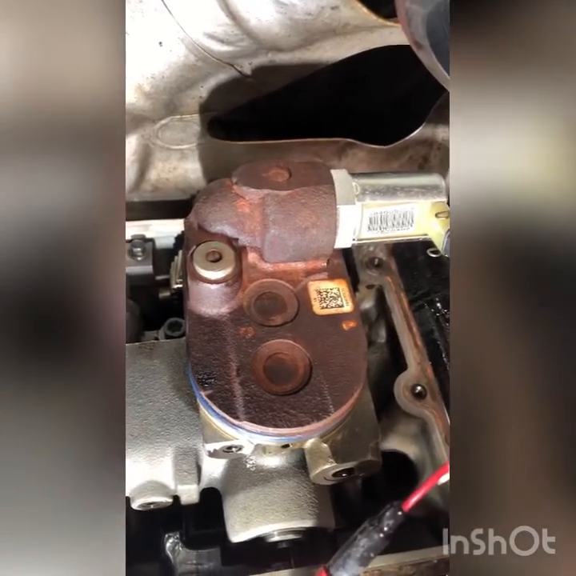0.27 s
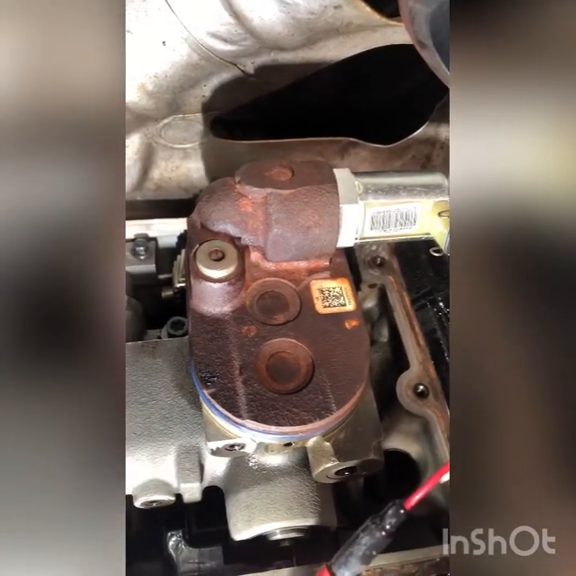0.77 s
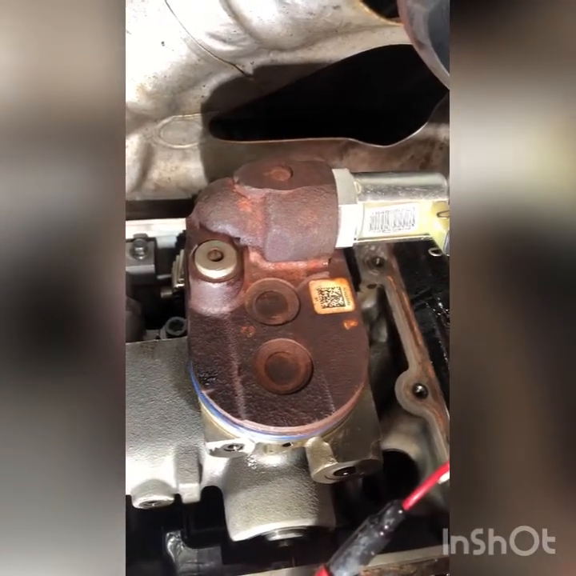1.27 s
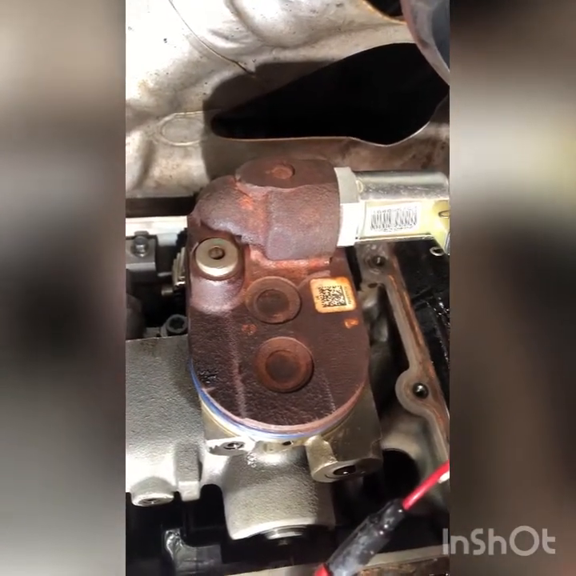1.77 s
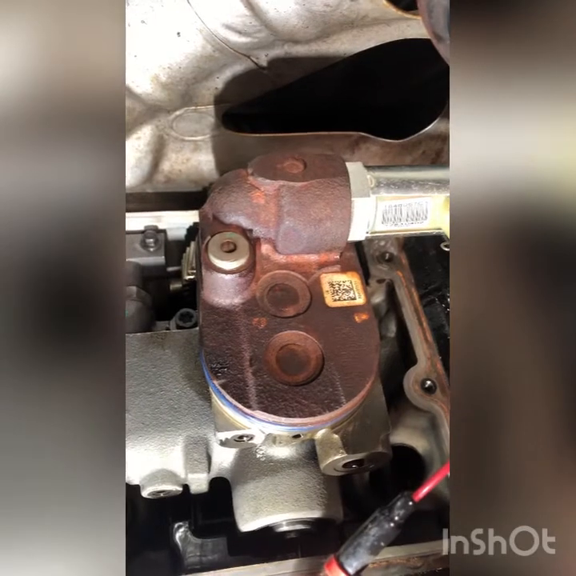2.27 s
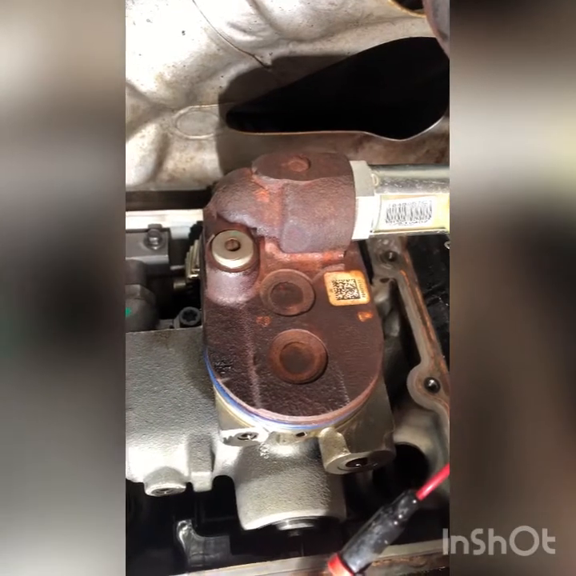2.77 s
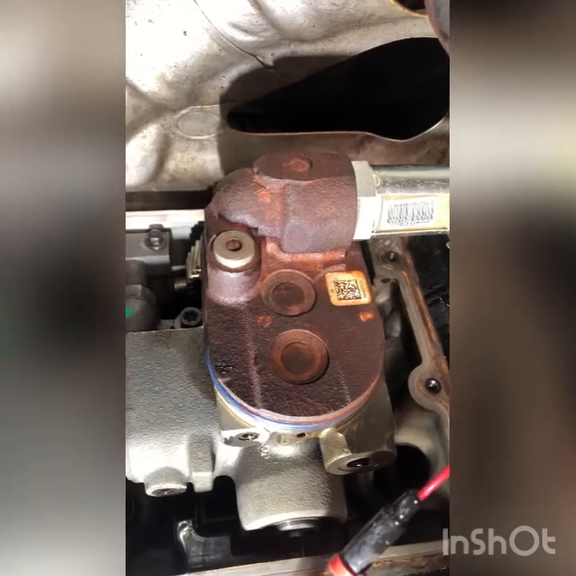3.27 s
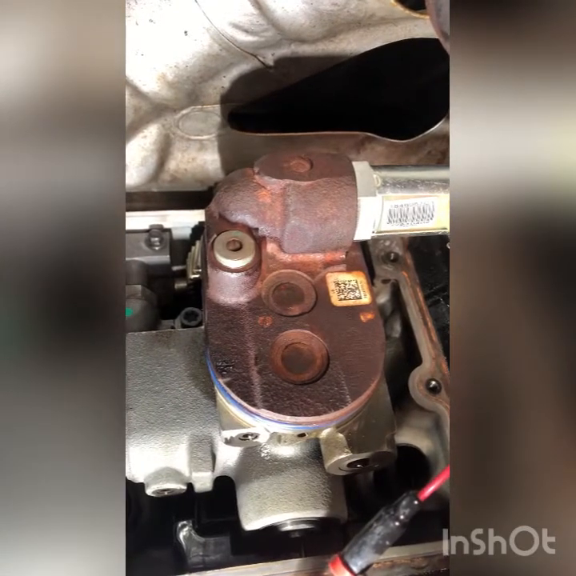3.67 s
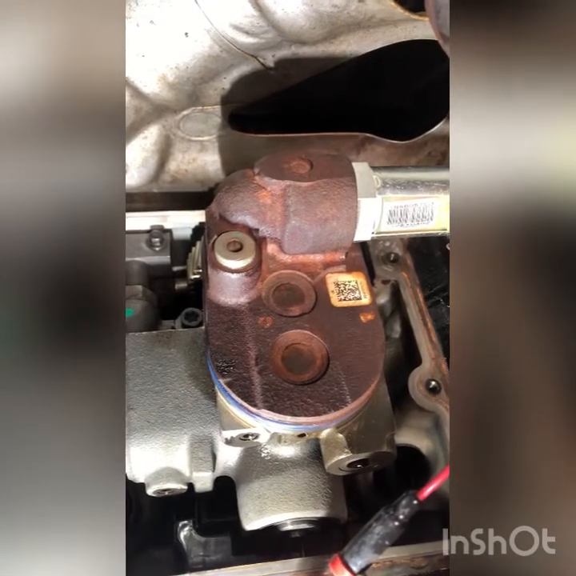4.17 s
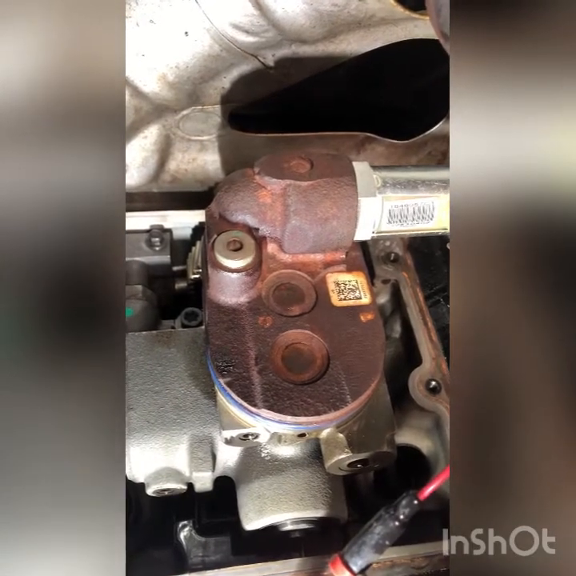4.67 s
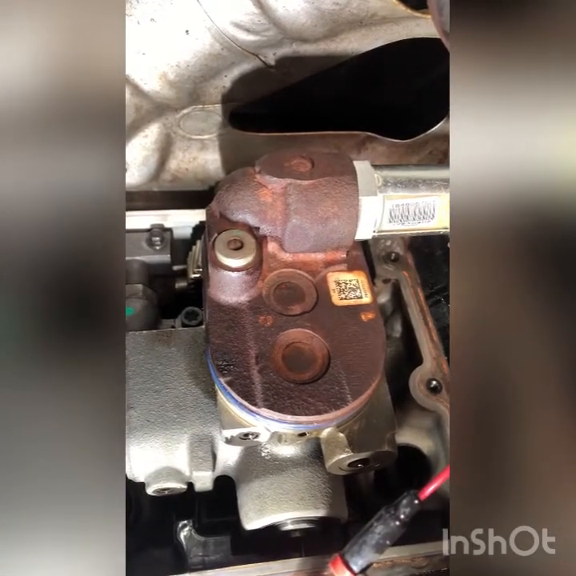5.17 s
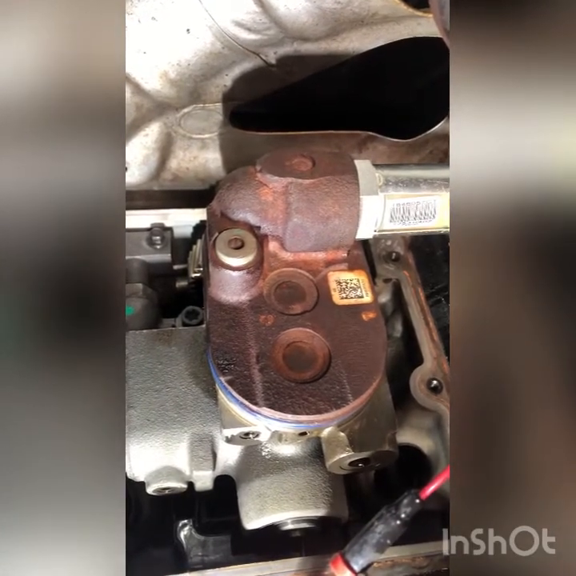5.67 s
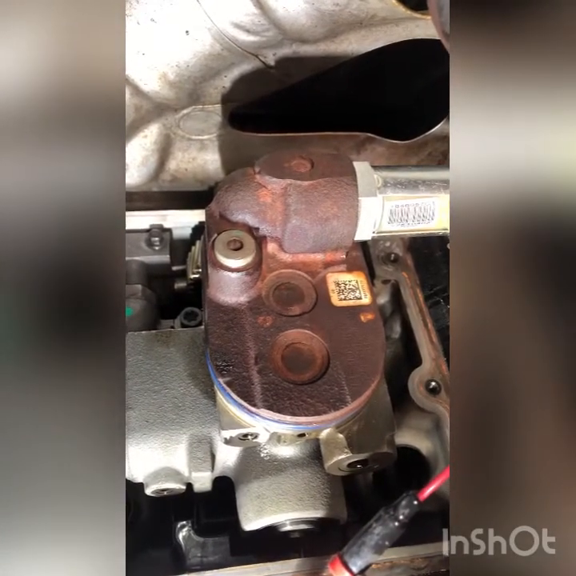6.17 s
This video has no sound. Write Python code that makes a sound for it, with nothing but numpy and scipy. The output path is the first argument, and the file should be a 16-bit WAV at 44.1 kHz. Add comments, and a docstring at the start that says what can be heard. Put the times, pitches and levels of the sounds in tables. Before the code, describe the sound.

Compressed air seeps thinly past a shut solenoid valve on an engine, close to the microphone, with faint high whistles. The valve ticks softly open and air hisses out, bright and steady, until a sharp, briefly ringing clack cuts it off and only the leak remains. This happens a second time, then a third burst runs on to the end. A quiet workshop rumbles low in the background.

```python
"""A thin, faintly whistling leak over the low rumble of a quiet workshop: compressed air seeps past
a shut solenoid valve on an engine, close to the microphone. The plunger ticks free and the air hisses
out, sounding the cavities of the casting, until the solenoid snaps the valve shut with a ringing clack
and only the leak is left. The valve opens three times; the last burst runs on."""
import sys
import numpy as np
from scipy import signal
from scipy.fft import rfft, irfft
from scipy.io import wavfile

SR = 44100
rng = np.random.default_rng(int(sys.argv[2]) if len(sys.argv) > 2 else 0)


def pcm_store(signal):
    """Save signal as 16-bit PCM."""
    levels = np.round(np.clip(np.atleast_2d(signal), -1, 1) * 32767)
    wavfile.write(sys.argv[1], SR, levels.astype(np.int16).T)


N = 282681
TIME = np.arange(N) / SR


def from_db(db):
    """Decibels to gain."""
    return 10 ** (np.asarray(db) / 20)


def rms_one(x):
    """Scale to unit power."""
    return x / np.sqrt(np.mean(x ** 2) + 1e-20)


def band(x, hz, width_hz):
    """Flat-topped resonance with steep sides, gain 1 on top."""
    low = np.hypot(hz, width_hz / 2) - width_hz / 2
    edges = [low, min(low + width_hz, SR / 2 - 100)]
    return signal.sosfilt(signal.butter(2, edges, "band", fs=SR, output="sos"), x + 1e-18)


def low_cut(x, hz):
    """Remove the bass below hz."""
    return signal.sosfilt(signal.butter(4, hz, "high", fs=SR, output="sos"), x)


def noise(spectrum):
    """Steady noise with a given colour, rms 1."""
    hz, db = np.transpose(spectrum)
    bins_hz = np.maximum(np.arange(N // 2 + 1) * SR / N, 1)
    colour = from_db(np.interp(np.log(bins_hz), np.log(hz), db))
    return rms_one(irfft(rfft(rng.standard_normal(N)) * colour, N))


def drift(rate):
    """Random wander of spread about 1 that turns rate times a second."""
    knots = rng.standard_normal(4096)
    return np.interp(TIME * rate, np.arange(len(knots)), knots)


def since(start):
    """Seconds after a moment, zero before it."""
    return np.maximum(TIME - start, 0)


def since_latest(moments):
    """Seconds after the latest of some ordered moments, or after time zero until the first."""
    age = TIME
    for moment in moments:
        age = np.where(TIME > moment, TIME - moment, age)
    return age


def dying(age, t60):
    """Exponential decay by 60 dB in t60 seconds."""
    return from_db(np.maximum(-60 * age / t60, -200))


def tone(pitch_hz):
    """A sine that follows a changing pitch."""
    return np.sin(2 * np.pi * np.cumsum(pitch_hz) / SR)


def glides(rows, waver_hz):
    """Tones that swell, slide evenly in pitch and fade, all with the same waver."""
    out = np.zeros(N)
    for start, length, first_hz, last_hz, db in rows:
        progress = np.clip((TIME - start) / length, 0, 1)
        pitch_hz = first_hz + (last_hz - first_hz) * progress + waver_hz
        swell = np.sqrt(8 * progress * (1 - progress))
        out += from_db(db) * swell * tone(pitch_hz)
    return out


def tick(start, t60, hz=11000, width_hz=12000):
    """A short, noisy contact of steel on steel, bright unless given a lower band."""
    envelope = (TIME > start) * dying(since(start), t60)
    return band(envelope * rng.standard_normal(N), hz, width_hz)


# Room tone, the building's rumble all around the microphone: (frequency [Hz], relative level [dB])
RUMBLE_SPECTRUM = [(15, -54), (25, 7), (35, -27), (54, 3), (86, -2.5), (130, -0.5), (189, -5), (218, -13),
                   (301, -16), (341, -15), (553, -20.5), (790, -13.5), (1400, -27), (1800, -25),
                   (2340, -42), (3960, -120)]
# Faint hiss in the same room tone: (frequency [Hz], relative level [dB])
ROOM_HISS_SPECTRUM = [(1000, 7.5), (3500, -9), (5000, 12.5), (7000, 8), (9600, -25), (12000, -23),
                      (15500, -9)]
# Machines humming far from the microphone: (frequency [Hz], level [dB])
MACHINE_HUM = [(72, -69), (120, -67), (148, -66.5)]

def workshop(rumble_db=-56.5, hiss_db=-72, waver_db=5.5, wander_hz=1.357):
    """Low rumble of the building with a wavering machine hum and a faint, even hiss."""
    hum = np.zeros(N)
    for hz, db in MACHINE_HUM:
        amplitude = np.sqrt(2) * from_db(db + waver_db * drift(5.2))
        hum += amplitude * tone(hz + wander_hz * drift(6))
    rumble = from_db(rumble_db) * noise(RUMBLE_SPECTRUM)
    return rumble + hum + from_db(hiss_db) * noise(ROOM_HISS_SPECTRUM)


# Whines from across the workshop:
# (time [s], length [s], first pitch [Hz], last pitch [Hz], level [dB])
FAR_WHINES = [(0.36, 0.65, 338, 346, -71), (2.46, 0.56, 352, 372, -70.5)]

def whines(waver_hz=3):
    """A faint, far whine that comes and goes, rising a little each time."""
    return glides(FAR_WHINES, waver_hz * drift(20))


# Soft bumps near the microphone: (time [s], frequency [Hz], width [Hz], time spread [s], level [dB])
NEAR_BUMPS = [(0.665, 770, 100, 0.0091, -63), (0.702, 418, 110, 0.0072, -55), (2.302, 184, 50, 0.017, -50),
              (2.813, 117, 49.5, 0.046, -52.5), (4.547, 145, 30, 0.023, -44),
              (4.548, 340, 200, 0.023, -53.5), (4.737, 184, 70, 0.0088, -42), (5.903, 407, 150, 0.019, -59),
              (6.127, 55, 40, 0.067, -53)]

def bumps():
    """Dull, short swells of low noise."""
    out = np.zeros(N)
    for peak_s, hz, width_hz, spread_s, db in NEAR_BUMPS:
        swell = np.exp(-.5 * ((TIME - peak_s) / spread_s) ** 2)
        out += from_db(db) * swell * rms_one(band(rng.standard_normal(N), hz, width_hz))
    return out


def walls(x, delay_s=0.011, t60=0.24, top_hz=1800):
    """Dull, diffuse echoes that reach the microphone from the engine bay and the walls."""
    tail = (TIME > delay_s) * dying(TIME, t60) * rng.standard_normal(N)
    tail /= np.linalg.norm(tail)
    dull_tail = signal.sosfilt(signal.butter(2, top_hz, fs=SR, output="sos"), tail)
    return signal.fftconvolve(x, dull_tail)[:N]


# Whistles at the valve seat, faint even close up:
# (time [s], length [s], first pitch [Hz], last pitch [Hz], level [dB])
SEAT_WHISTLES = [(0.32, 0.07, 9050, 8550, -70), (0.495, 0.075, 9170, 9130, -65),
                 (2.905, 0.087, 7550, 7200, -63), (3.04, 0.41, 6950, 9340, -67)]

def whistles(waver_hz=95, flicker_db=3):
    """The leak locks briefly into a thin, unsteady tone that glides as the gap creeps."""
    return glides(SEAT_WHISTLES, waver_hz * drift(400)) * from_db(flicker_db * drift(40))


# Bursts of the valve in front of the microphone; the last shuts only after the scene has ended:
# (opening time [s], shutting time [s], flow gain [dB], clack gain [dB])
VALVE_BURSTS = [(0.868, 2.3613, 0, 0.7), (3.663, 4.7608, 0, -2), (5.589, 7.0, -0.04, -2.2)]

def flow(rise_s, shut_t60=0.042, seating_s=0.00056):
    """Air flow: it swells as the plunger lifts and collapses once it has landed."""
    out = np.zeros(N)
    for opens, shuts, flow_db, _ in VALVE_BURSTS:
        swell = 1 - np.exp(-since(opens) / rise_s)
        out += from_db(flow_db) * swell * dying(since(shuts + seating_s), shut_t60)
    return out


def leak(settled_db=-24.5, tight_db=-7.5, level_relax_s=0.46, tilt_relax_s=0.2, already_shut_s=0.5):
    """Each snap presses the seat tight: the leak turns weaker and duller, then creeps back."""
    shut_for = since_latest([-already_shut_s] + [shuts for _, shuts, _, _ in VALVE_BURSTS])
    level_db = settled_db + tight_db * np.exp(-shut_for / level_relax_s)
    tilt_db_per_octave = 0.2 - 4 * np.exp(-shut_for / tilt_relax_s)
    return level_db, tilt_db_per_octave


def unsticking(lead_s=0.008, tick_db=-46):
    """The plunger ticks softly as it comes free, just before the air gets through."""
    return from_db(tick_db) * sum(tick(opens - lead_s, t60=0.032) for opens, *_ in VALVE_BURSTS)


def shudder(thud_db=-13, t60=0.077, hz=500, width_hz=800):
    """The snap shakes the many parts around the valve into a short, pitchless thud."""
    return sum(from_db(thud_db + clack_db) * tick(shuts, t60, hz, width_hz)
               for _, shuts, _, clack_db in VALVE_BURSTS)


# Ringing of the valve body and its mount, close up: (frequency [Hz], relative level [dB], t60 [s])
BODY_MODES = [(72, -47.5, 1.34), (144.1, -38.5, 0.5), (178, -22, 0.045), (239.6, -36.5, 0.29),
              (315, -40, 0.022), (423, -37, 0.15), (544, -32, 0.19), (700, -36, 0.29), (722.6, -33.5, 0.32),
              (738, -13.5, 0.076), (777, -24.5, 0.15), (884, -21, 0.02), (997, -26, 0.05),
              (1193, -31.5, 0.044), (1250, -43, 0.05), (1514, -29, 0.04), (1850, -30, 0.06),
              (2057, -25, 0.056), (2140, -16.5, 0.029), (2236, -33, 0.11), (2380, -44, 0.11),
              (2510, -29, 0.065), (2557, -23.5, 0.064), (2642, -18.5, 0.05), (2800, -40, 0.08),
              (2820, -24, 0.062), (3020, -49, 0.077), (4040, -33, 0.073), (4310, -27.5, 0.024)]

def clack(delay_cycles=0.93, ring_db=-0.5, tick_db=-27):
    """The plunger lands: a tick, and body modes that each start about a cycle late."""
    out = np.zeros(N)
    for _, shuts, _, clack_db in VALVE_BURSTS:
        ringing = (TIME > shuts) & (TIME < shuts + 1)
        for hz, db, t60 in BODY_MODES:
            age = np.maximum(TIME[ringing] - shuts - delay_cycles / hz, 0)
            mode = dying(age, t60) * np.sin(2 * np.pi * hz * age)
            out[ringing] += from_db(ring_db + clack_db + db) * mode
        out += from_db(clack_db + tick_db) * tick(shuts, t60=0.017)
    return low_cut(out, hz=60)  # the clack carries no deep bass


def jet_colour(hz, open_for, pivot_hz=7050, spurt_db=3, spurt_hz=7460, spurt_octaves=0.14, spurt_s=0.18):
    """Gain of the open jet at one pitch: a shrill first spurt, then a slow mellowing."""
    tilt_db_per_octave = 0.43 - 0.5 * open_for
    spurt = np.exp(-(np.log2(hz / spurt_hz) / spurt_octaves) ** 2 - open_for / spurt_s)
    return from_db(tilt_db_per_octave * np.log2(hz / pivot_hz) + spurt_db * spurt)


# Air resonances of the passages in the casting, close to the microphone:
# (frequency [Hz], width [Hz], gain [dB])
CASTING_PASSAGES = [(241.3, 27, -36.5), (310, 450, -47.5), (534, 30, -40.5), (759, 157, -35.5),
                    (792.2, 21, -28.5), (900, 36, -42), (1034, 116, -39), (1186, 79, -38.5),
                    (1304, 34, -36.5), (1516, 160, -40.5), (1691, 186, -35), (2024, 84, -30),
                    (2146, 96, -25), (2238, 41, -24.5), (2360, 63, -23.5), (2493, 56, -23),
                    (2529, 31, -20.5), (2650, 78, -20), (2860, 210, -26.5), (2916, 68, -21.5),
                    (3044, 31, -26), (3310, 185, -32.5), (3494, 58, -30), (3610, 250, -38.5),
                    (3820, 110, -29), (4001, 101, -20.5), (4159, 161, -20.5), (4270, 39, -22),
                    (4466, 36, -29), (4730, 85, -38.5), (4700, 740, -42.5), (5400, 58, -30.5),
                    (5624, 63, -20), (5752, 120, -23), (5902, 68, -37), (6170, 111, -24.5),
                    (6410, 110, -37.5), (6940, 480, -36), (7110, 94, -35), (7266, 70, -25),
                    (7472, 156, -20.5), (7630, 71, -30), (7800, 260, -32), (8130, 133, -27.5),
                    (8630, 250, -31.5), (9100, 270, -30), (9770, 647, -44.5), (10427, 172, -25.5),
                    (10886, 350, -24.5), (10900, 32, -31), (11470, 136, -26.5), (11900, 230, -38.5),
                    (12200, 380, -43), (12785, 150, -31.5), (13114, 216, -42), (14200, 72, -32),
                    (13750, 330, -29.5), (14483, 190, -33), (14715, 131, -30.5), (15071, 1406, -36.5)]

def hiss(deep_hz=1700, shrill_hz=11500, leak_low_hz=2200, leak_pivot_hz=5500, leak_top_hz=13000):
    """Jet and leak sound the passages; the deepest and shrillest need full flow, the leak is thinner."""
    early_flow, full_flow = flow(rise_s=0.024), flow(rise_s=0.025) ** 2
    leak_db, leak_tilt = leak()
    open_for = since_latest([opens for opens, *_ in VALVE_BURSTS])
    flutter_db, sputter_db = -0.03 * drift(16), 0.16 * drift(350)
    turbulence = from_db(-0.12 + flutter_db + sputter_db)
    out = np.zeros(N)
    for hz, width_hz, db in CASTING_PASSAGES:
        early_share = 1 / (1 + (deep_hz / hz) ** 4 + (hz / shrill_hz) ** 4)
        passage_flow = early_share * early_flow + (1 - early_share) * full_flow
        jet = jet_colour(max(hz, deep_hz), open_for) * passage_flow
        leak_band = 1 / np.sqrt(1 + (leak_low_hz / hz) ** 8 + (hz / leak_top_hz) ** 4)
        seep = leak_band * from_db(leak_db + leak_tilt * np.log2(hz / leak_pivot_hz))
        rush = (jet + seep) * turbulence * rng.standard_normal(N)
        out += from_db(db) * band(rush, hz, width_hz)
    return out


def scene(echo_db=-22):
    """The valve close up with the workshop behind it, the same in both channels."""
    valve = hiss() + whistles() + unsticking() + clack() + shudder()
    mono = valve + from_db(echo_db) * walls(valve) + bumps() + whines() + workshop()
    return np.tile(mono, (2, 1))


def record(dry, low_cut_hz=36, top_hz=15800):
    """The microphone loses the deepest bass; the top is cut steeply."""
    top_cut = signal.ellip(12, .1, 90, top_hz, fs=SR, output="sos")
    return signal.sosfilt(top_cut, low_cut(dry, low_cut_hz))


dry = scene()
out = record(dry)
pcm_store(out)
```